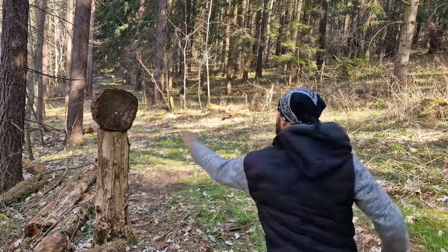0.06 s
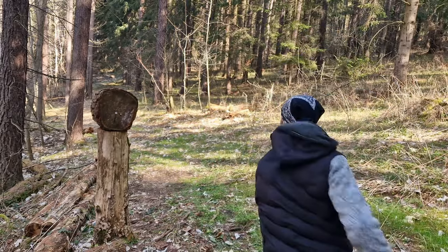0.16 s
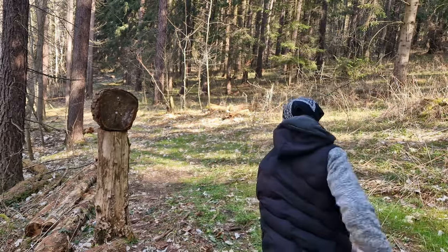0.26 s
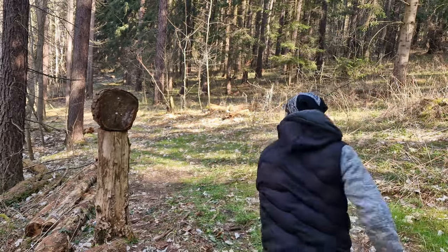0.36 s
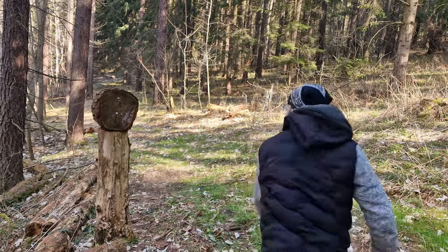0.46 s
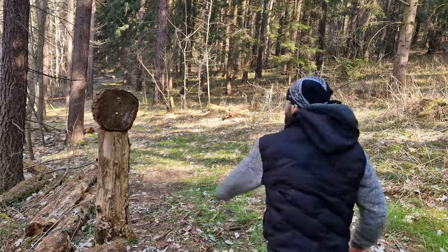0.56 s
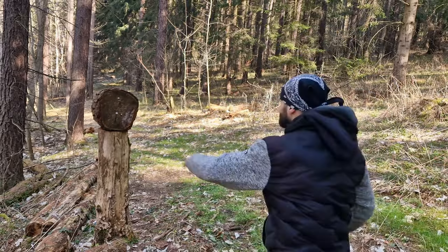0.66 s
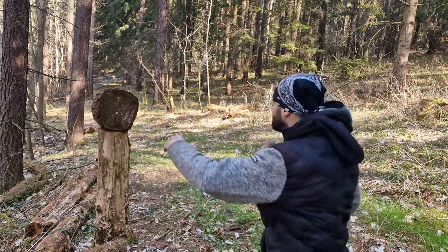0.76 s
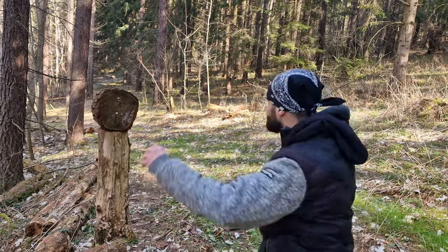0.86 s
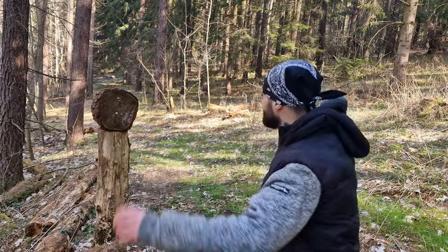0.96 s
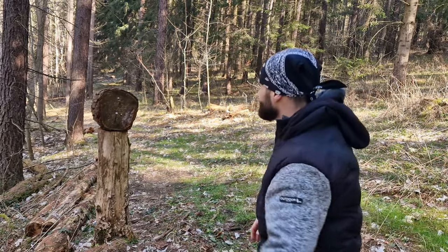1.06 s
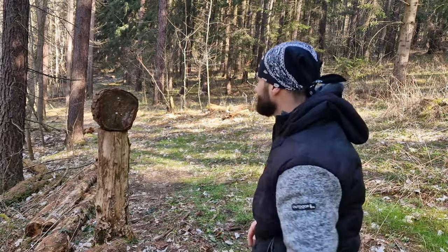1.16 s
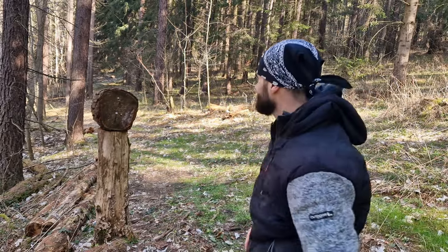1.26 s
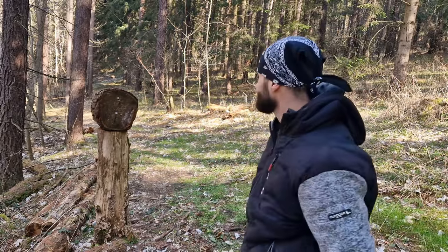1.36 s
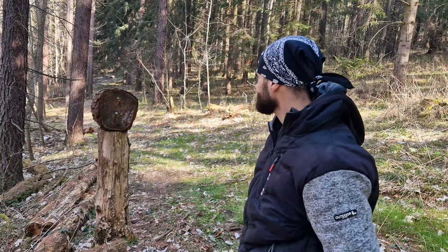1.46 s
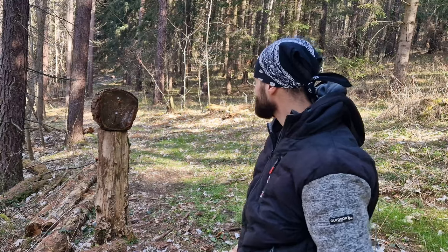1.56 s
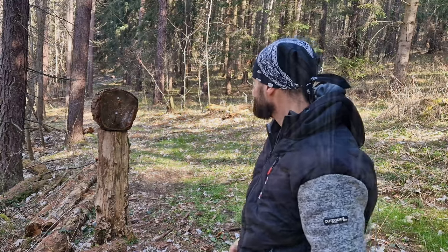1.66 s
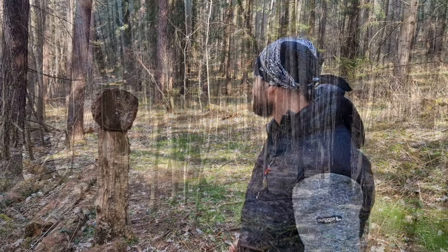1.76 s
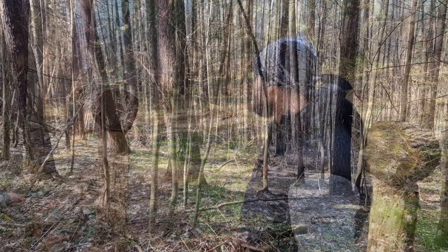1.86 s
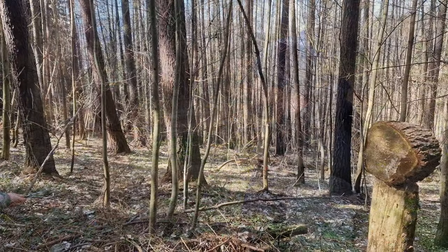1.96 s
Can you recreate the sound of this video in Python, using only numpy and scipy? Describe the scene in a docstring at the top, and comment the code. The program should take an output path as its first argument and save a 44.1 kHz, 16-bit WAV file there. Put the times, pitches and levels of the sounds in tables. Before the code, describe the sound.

A thrown nail cracks into a log with a thud, amid soft jacket rustling.

```python
"""In a forest, a thrown nail sticks in a log: the point splits the wood fibres with a crack,
the log thuds, the nail rings faintly and the trees throw the sound back.
Close by, the thrower's padded jacket swishes, flaps and ticks as he follows through and turns.
Low wind rumbles underneath, and near the end small birds chirp far off."""
import sys
import numpy as np
from scipy import signal
from scipy.fft import rfft, irfft, next_fast_len
from scipy.io import wavfile
from scipy.ndimage import map_coordinates

SR = 44100
rng = np.random.default_rng(int(sys.argv[2]) if len(sys.argv) > 2 else 0)


def dump_mix(stems):
    """Bounce the given channels to the path in sys.argv[1] as a 16-bit WAV at rate SR."""
    frames = np.atleast_2d(stems).T  # one column per channel
    limited = np.clip(frames, -1, 1)  # hard clip at full scale
    pcm = np.round(limited * 32767).astype(np.int16)
    wavfile.write(sys.argv[1], SR, pcm)


N = 88200  # 2 seconds


def amp(db):
    """Turn decibels into a number to multiply by."""
    return 10 ** (np.asarray(db) / 20)


def unit(x):
    """Scale a sound so that its average strength (rms) is 1."""
    return x / np.sqrt(np.mean(x ** 2) + 1e-20)


def along(points, hz):
    """Read between (frequency, value) points, with the octaves evenly spaced."""
    frequencies, values = np.transpose(points)
    return np.interp(np.log(hz + 1), np.log(frequencies + 1), values)


def since(start):
    """Seconds since the start time, zero before it."""
    return np.maximum(np.arange(N) / SR - start, 0)


def curve(points):
    """Join (time, value) points with straight lines, one value per sample."""
    return np.interp(since(0), *np.transpose(points))


def wobble(rate):
    """A smooth curve through `rate` random values a second."""
    values = rng.standard_normal(int(N * rate / SR) + 4)
    return map_coordinates(values, [np.arange(N) * rate / SR])


def filtered(x, response):
    """Multiply each frequency in a sound by response(hz)."""
    size = next_fast_len(N + SR // 2)
    return irfft(rfft(x, size) * response(np.fft.rfftfreq(size, 1 / SR)), size)[..., :N]


def noise(tone):
    """One channel of noise with the given tone, at strength 1."""
    return unit(filtered(rng.standard_normal(N), lambda hz: amp(along(tone, hz))))


# How alike left and right are (frequency [Hz], likeness [1 = the same])
LIKENESS = [(100, 0.98), (400, 0.78), (1000, 0.41), (2500, 0.33), (5000, 0.22), (12000, 0.14)]

def rush(tone, grain_db):
    """Grainy stereo noise at strength 1, wider in the highs."""
    def shape(hz):
        width = np.arccos(np.clip(along(LIKENESS, hz), -1, 1)) / 2
        return amp(along(tone, hz)) * [np.cos(width), np.sin(width)]
    grains = rng.standard_normal((2, N)) * amp(grain_db * wobble(900))
    mid, side = filtered(grains, shape)
    return unit(np.array([mid + side, mid - side]))


# How loud the sliding and the bending cloth are (time [s], relative level [dB])
SWISH_LEVELS = [(0, -52.5), (.07, -53.5), (.165, -65), (.25, -68), (.335, -71.5), (.37, -64), (.42, -78.5),
                (.48, -84.5), (.61, -73), (.68, -80), (.81, -77.5), (.86, -80), (.92, -69), (.97, -78.5),
                (1.01, -85.5), (1.12, -88), (1.2, -64.5), (1.28, -71.5), (1.35, -72.5), (1.44, -77.5),
                (1.495, -72), (1.55, -86), (1.7, -98.5), (1.755, -79), (1.85, -97), (2, -102)]
RUSTLE_LEVELS = [(0, -44.5), (.06, -48), (.12, -51.5), (.17, -53.5), (.27, -61), (.36, -61), (.48, -70.5),
                 (.63, -63.5), (.75, -70.5), (.85, -69.5), (.9, -66), (1.05, -75.5), (1.2, -65.5),
                 (1.34, -67), (1.46, -78), (1.6, -84), (2, -86)]
# The tone of each (frequency [Hz], relative level [dB])
SWISH_TONE = [(300, -24), (1500, -1.5), (2700, 0), (4500, 3.5), (7000, 1.5), (10000, 0), (15000, -2)]
RUSTLE_TONE = [(60, -24), (150, -2.5), (350, -1.5), (650, -2), (1200, -6), (2000, -11), (4000, -19),
               (9000, -35.5)]

def jacket():
    """Smooth fabric hisses as it slides on itself; the padding crumples with a lower sound."""
    swish_db = curve(SWISH_LEVELS) + 6.5 + 1.9 * wobble(50.25)
    swish = amp(swish_db) * rush(SWISH_TONE, grain_db=2)
    rustle_db = curve(RUSTLE_LEVELS) + 0.5 + 2.77 * wobble(60)
    rustle = amp(rustle_db) * rush(RUSTLE_TONE, grain_db=1.5)
    return swish + rustle


# The rise and fall of the wind's rumble (time [s], relative level [dB])
RUMBLE_LEVELS = [(0, -50.5), (.12, -50.5), (.17, -55), (.24, -50), (.32, -61), (.38, -55.5), (.47, -56.5),
                 (.56, -55.5), (.65, -58), (.76, -50), (.85, -57.5), (.93, -53.5), (1.0, -56.5),
                 (1.16, -51.5), (1.35, -53.5), (1.56, -61), (1.7, -48.5), (1.81, -56.5), (1.89, -49.5),
                 (2, -56.5)]
# The tone of the rumble and of the treetops (frequency [Hz], relative level [dB])
RUMBLE_TONE = [(20, -17), (32, -5.5), (48, 0), (62, -1), (85, 1), (105, -5.5), (135, -22), (300, -54),
               (1000, -81)]
TREETOP_TONE = [(90, -20.5), (150, -7), (230, -7.5), (395, 1), (520, -5.5), (1100, -15.5), (2300, -22.5),
                (4300, -23.5), (6000, -28), (7500, -26.5), (9500, -41.5), (15500, -47)]

def wind():
    """Wind rumbles low under the faint rush of the treetops."""
    rumble = amp(curve(RUMBLE_LEVELS) - 1.5) * rush(RUMBLE_TONE, grain_db=1)
    treetops = amp(-65.5 + 0.97 * wobble(5.94)) * rush(TREETOP_TONE, grain_db=1.5)
    return rumble + treetops


# Folds of the jacket popping over (time [s], peak level [dB], pitch [Hz])
FOLD_POPS = [(0.021, -31.5, 750), (.134, -36, 840), (0.3209, -36.5, 1120), (0.365, -45, 808),
             (.4245, -44, 1208), (.63, -48, 900), (.871, -48, 860), (1.154, -50, 950), (1.185, -45, 690),
             (1.2879, -45, 890), (1.293, -37, 810), (1.299, -48, 800), (1.788, -47.5, 750)]

def flaps(echo_db=-8.5):
    """Each fold pops over with one short push of air, and the trees answer."""
    pops = np.zeros(N)
    for time, db, hz in FOLD_POPS:
        spread = (np.pi * hz * (since(0) - time)) ** 2
        pops -= amp(db) * (1 - 2 * spread) * np.exp(-spread)  # one pulse with a small swing each side
    return pops + amp(echo_db) * np.std(pops) * unit(forest_echo(pops))


# How long the far trees echo (frequency [Hz], time to fade by 60 dB [s])
ECHO_FADES = [(100, 0.33), (400, .34), (1200, 0.41), (2300, .6), (6000, 0.32), (14000, .28)]
# The tone of the echo (frequency [Hz], relative level [dB])
ECHO_TONE = [(100, -5), (210, -5.5), (330, -2.5), (600, -1), (1000, -1.5), (1750, 7), (2150, 2), (2500, 8),
             (3300, 3), (4500, -9), (6000, -9), (7500, -5), (14000, 0)]
GROUND_DELAY_S = .0045  # the bounce off the ground comes this late; the echo starts then too

def forest_echo(sound, far_db=-19.5, near_db=-16.5, near_fade_s=.12):
    """Sound bounces quickly off the near trunks and washes back more slowly from the far ones."""
    hz, t, bands = signal.stft(rush(ECHO_TONE, grain_db=4)[:, :SR // 2], SR, nperseg=256)
    fades = amp(-60 * t / along(ECHO_FADES, hz)[:, None])
    far = signal.istft(bands * fades, SR, nperseg=256)[1]
    near = rush(ECHO_TONE, grain_db=4) * amp(-60 * since(0) / near_fade_s)
    near = near[:, :far.shape[1]]
    echo = amp(far_db) * far / np.linalg.norm(far[0]) + amp(near_db) * near / np.linalg.norm(near[0])
    delayed = np.pad(sound, (round(GROUND_DELAY_S * SR), 0))
    return signal.fftconvolve(delayed[None], echo, axes=1)[:, :N]


def ringing(notes, t):
    """A struck object rings with several pure notes, each fading at its own speed."""
    return sum(amp(db - 60 * t / fade_s) * np.sin(2 * np.pi * hz * t) for hz, db, fade_s in notes)


def from_left(sound, lead_s=.00014):
    """A sound from the left reaches the left ear a moment before the right."""
    return filtered(sound, lambda hz: np.exp(1j * np.pi * hz * lead_s * np.array([[1], [-1]])))


# The notes of the log and the stuck nail (pitch [Hz], relative level [dB], time to fade by 60 dB [s])
LOG_NOTES = [(92.3, -28, .11), (185, -27, .04), (294, -5, .017), (405, 0, 0.0099), (577, -27, .02),
             (882, -17.5, .018), (1420, -22, .02), (2150, -22.5, 0.016)]
NAIL_NOTES = [(2265, -54, .33), (2345, -54, .45), (2400, -56.5, 0.24), (4370, -20, 0.015),
              (5120, -26.5, .01), (6150, -33.5, .012), (7520, -35, .035)]
# The crack's tone, and its tone off bark and fallen leaves (frequency [Hz], relative level [dB])
CRACK_TONE = [(1500, -20), (3200, -9.5), (4100, 5.5), (5300, 0), (6500, -5.5), (7800, -2), (9000, -8.5),
              (15000, -19)]
SCATTER_TONE = [(180, 4), (300, -2), (450, -10), (650, 1), (1000, 1), (1600, 4.5), (2300, 7.5), (2700, -1),
                (3300, 4.5), (4500, -1), (6000, -5), (7700, -4), (9000, -5), (15000, -11)]
HIT_S, PUSH_DELAY_S, THUD_RISE_S = .1848, .0001, .0018
CRACK_HOLD_S, CRACK_FADE_S, SCATTER_FADE_S = .0016, .0044, .18  # a fade is a drop of 60 dB

def nail_hit(crack_db=-25.5, scatter_db=-40, ground_db=-12, left_louder_db=2.2):
    """Fibres crack as the point drives in; the log is pushed back and thuds; the nail rings faintly."""
    t, pushed = since(HIT_S), since(HIT_S + PUSH_DELAY_S)
    rise = 1 - np.exp(-(pushed / THUD_RISE_S) ** 2)
    thud = -ringing(LOG_NOTES, pushed) * rise
    tear_level = amp(crack_db - 60 * since(HIT_S + CRACK_HOLD_S) / CRACK_FADE_S) * (t > 0)
    fibres = np.std(tear_level) * unit(noise(CRACK_TONE) * tear_level)
    crack = fibres + ringing(NAIL_NOTES, pushed)
    scatter = amp(scatter_db - 60 * t / SCATTER_FADE_S) * (t > 0) * rush(SCATTER_TONE, grain_db=6.5)
    ground_bounce = amp(ground_db) * filtered(crack, lambda hz: np.exp(-2j * np.pi * hz * GROUND_DELAY_S))
    balance = amp(left_louder_db * np.array([[.5], [-.5]]))
    hit = from_left(thud) + balance * from_left(crack + ground_bounce)
    return hit + scatter + forest_echo(thud + crack)


# Small dry ticks of the jacket (time [s], relative level [dB])
CLOTH_TICKS = [(0.7184, -48.5), (0.967, -52), (1.2835, -52), (1.3504, -44.5), (1.4237, -50), (1.459, -52.5),
               (1.524, -51.5)]
# Their tone (frequency [Hz], relative level [dB])
TICK_TONE = [(500, -16), (2000, -4), (4000, 1), (7500, 3.5), (15000, -6)]

def ticks(fade_s=.014):
    """The cloth gives short, bright snaps that die away at once."""
    level = sum(amp(db - 60 * since(time) / fade_s) * (since(time) > 0) for time, db in CLOTH_TICKS)
    return .5 * level * rush(TICK_TONE, grain_db=2)


# Far-off chirps (time [s], length [s], start pitch [Hz], end pitch [Hz], level [dB])
BIRD_NOTES = [(1.538, 0.05, 7100, 7550, -85), (1.709, 0.061, 3600, 5020, -76.5),
              (1.835, 0.057, 7800, 7050, -82.5), (1.842, 0.0148, 4800, 3610, -77.5),
              (1.855, .03, 3400, 4630, -78), (1.888, 0.013, 3600, 4800, -77),
              (1.968, .026, 3700, 4720, -79)]

def birds(echo_db=-2):
    """Small birds sing thin notes that slide up or down, blurred by the trees."""
    song = np.zeros(N)
    for time, length, start_hz, end_hz, db in BIRD_NOTES:
        progress = np.clip(since(time) / length, 0, 1)
        hz = start_hz * (end_hz / start_hz) ** progress * (1 + 0.0098 * wobble(140))
        swell = np.sqrt(np.abs(np.sin(np.pi * progress)))
        song += amp(db + 3 * wobble(150)) * swell * np.sin(2 * np.pi * np.cumsum(hz) / SR)
    return song + amp(echo_db) * np.std(song) * unit(forest_echo(song))


def scene():
    """Everything heard from where the thrower stands."""
    return jacket() + wind() + flaps() + nail_hit() + ticks() + birds()


def record(dry, top_hz=15850):
    """Cut away the very highest sounds."""
    return filtered(dry, lambda hz: hz < top_hz)


dry = scene()
out = record(dry)
dump_mix(out)
```